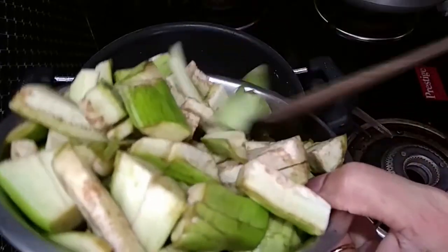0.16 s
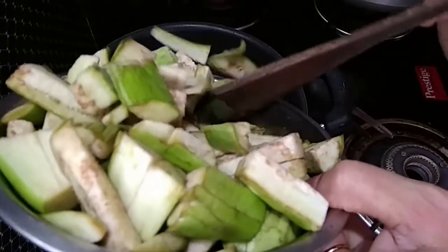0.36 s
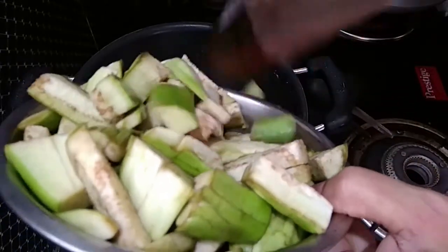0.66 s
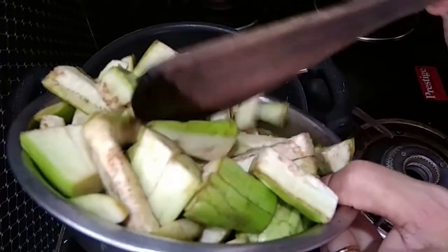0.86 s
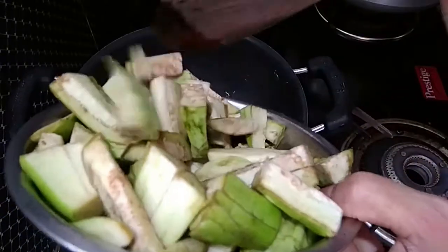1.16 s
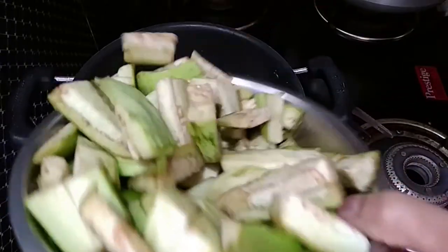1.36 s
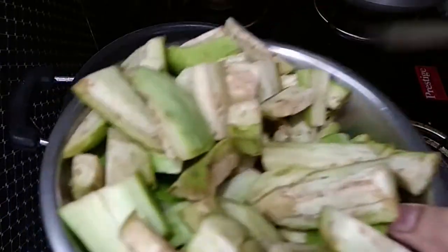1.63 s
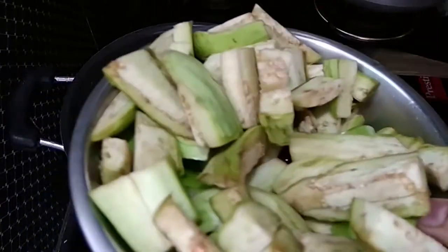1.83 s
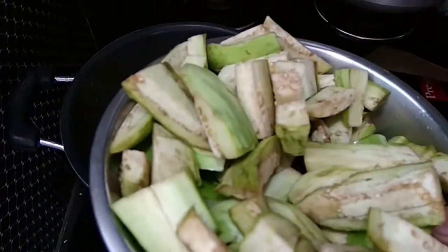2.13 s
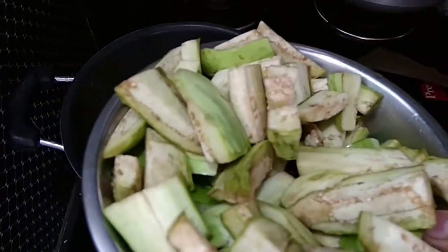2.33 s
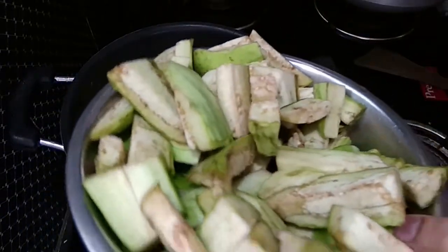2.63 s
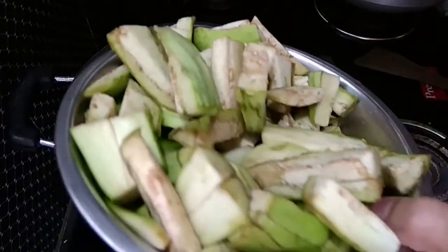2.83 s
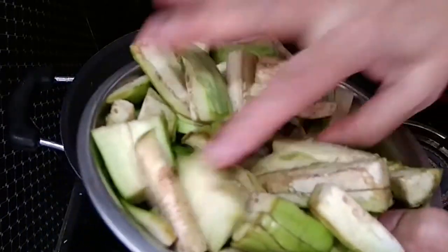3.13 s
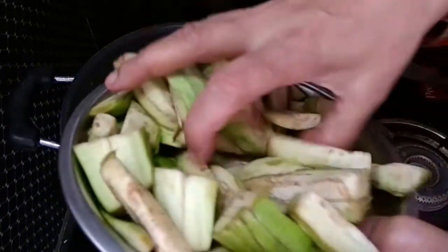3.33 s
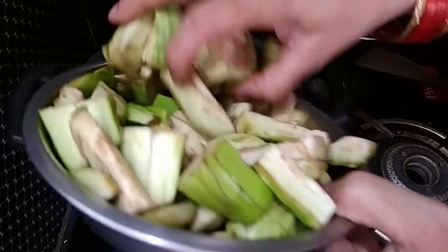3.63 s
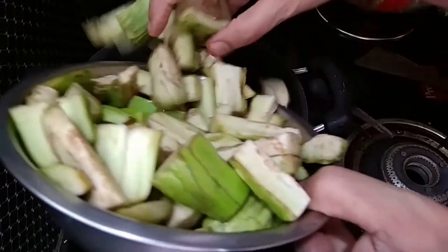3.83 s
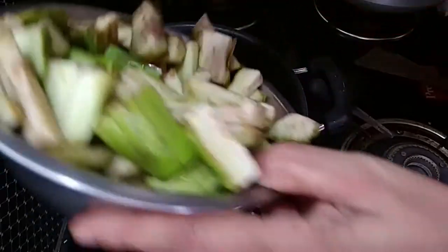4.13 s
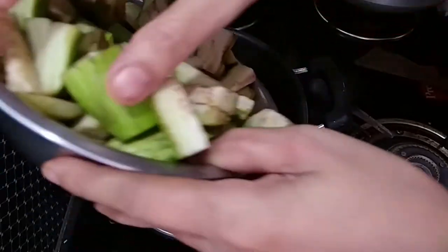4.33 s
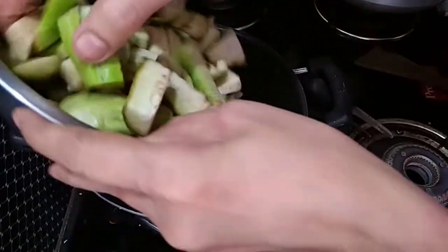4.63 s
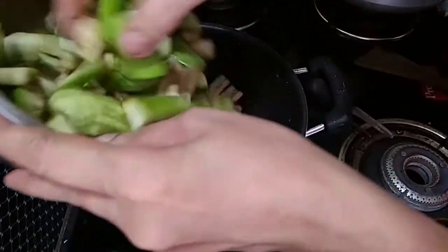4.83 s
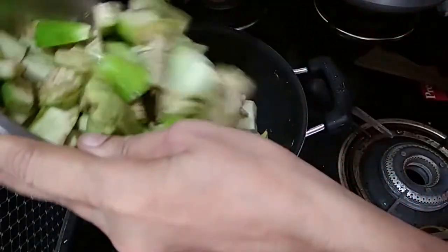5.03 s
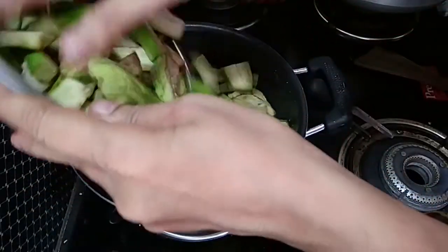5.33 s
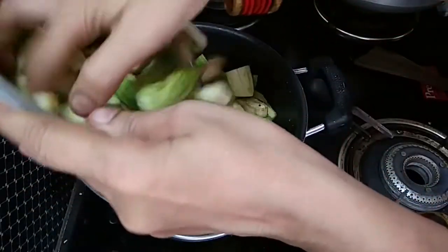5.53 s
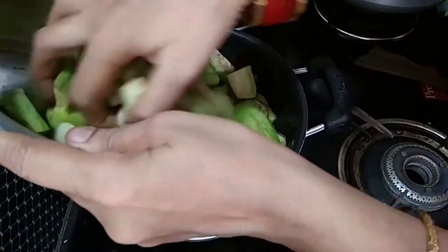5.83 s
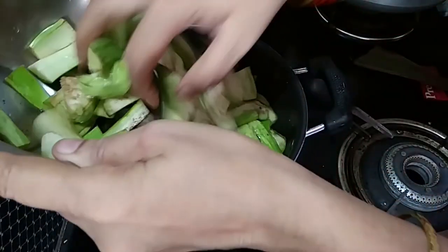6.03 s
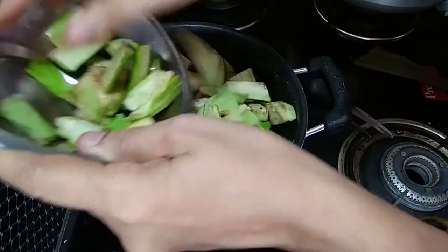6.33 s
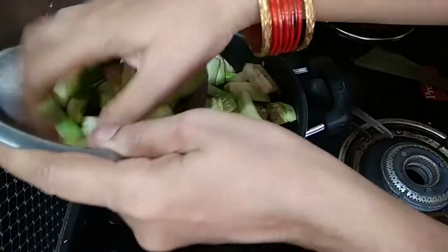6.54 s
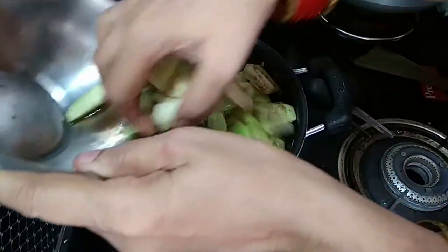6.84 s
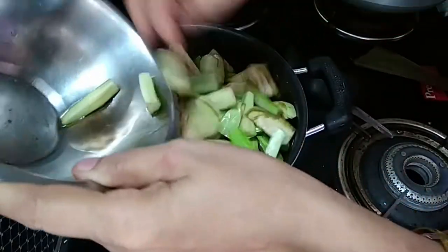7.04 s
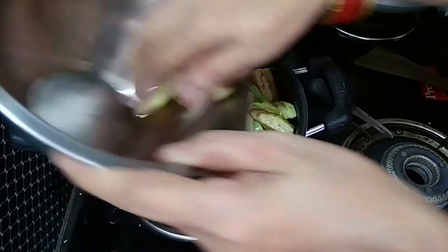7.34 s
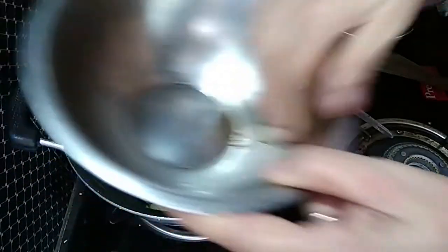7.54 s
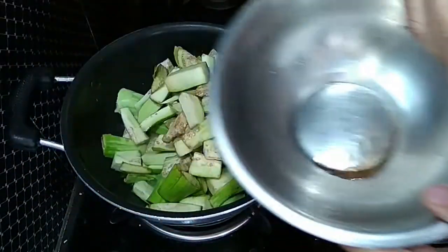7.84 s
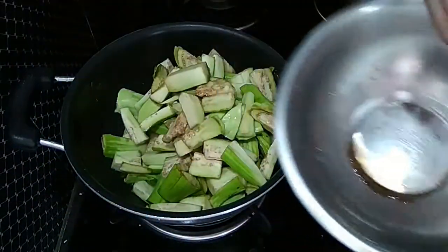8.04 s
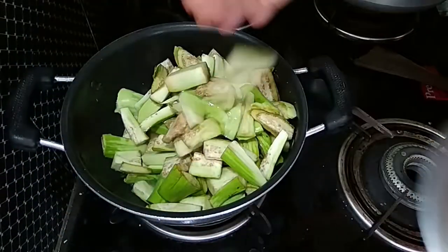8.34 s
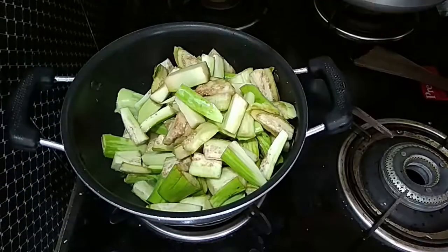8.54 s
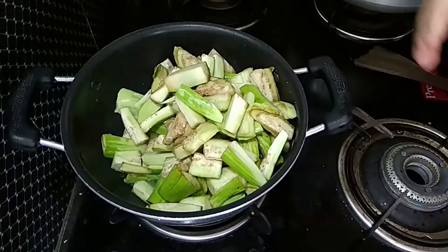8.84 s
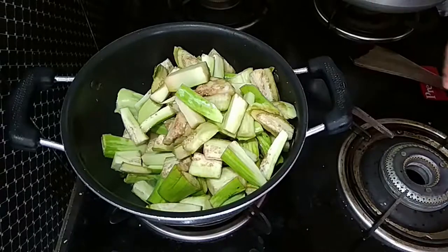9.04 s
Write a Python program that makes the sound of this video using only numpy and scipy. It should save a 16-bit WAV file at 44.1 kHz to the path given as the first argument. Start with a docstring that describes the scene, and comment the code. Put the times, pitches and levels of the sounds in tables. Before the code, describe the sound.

Hot oil fizzes and crackles close up as wet vegetable chunks tumble into a deep pan, with wooden knocks, soft thuds and sharp spits.

```python
"""A kitchen, just above a deep pan: oil sizzles as wet vegetable pieces are pushed in from a steel bowl,
first with a wooden spatula, then by hand. Random steam-burst impulses make the fizz and coarse frying;
their levels follow a drawn curve, with added flare-ups. Filtered impulses make the heap patter and tumble.
Damped resonances make thuds, clonks and knocks; short noises make slides, pops and spitting drops.
Early on, dull pressure pulses bump close to the right microphone. Reverberation and a low floor surround the pan."""
import sys
import numpy as np
from scipy import signal
from scipy.fft import rfft, irfft, next_fast_len
from scipy.io import wavfile

SR = 44100
rng = np.random.default_rng(int(sys.argv[2]) if len(sys.argv) > 2 else 0)


def bounce(signal):
    """Save signal as a 16-bit WAV file at the path given by the first command-line argument."""
    frames = np.transpose(np.atleast_2d(signal))
    limited = np.clip(frames, -1, 1)
    pcm = np.round(limited * 32767).astype(np.int16)
    wavfile.write(sys.argv[1], SR, pcm)


N = 404838  # length in samples

# how hard the oil boils; a load of cold pieces damps it for a while.
# Levels before the lift below: time_s, fizz_db, coarse_db
FRYING_CURVE = [(0, -29, -42), (.85, -27.5, -38), (1.6, -28.5, -41), (2.5, -29.5, -40), (3.0, -29.5, -45.5),
                (3.27, -32, -46), (3.42, -33, -48), (3.92, -32, -47.5), (4.05, -29.5, -41),
                (4.46, -27.5, -36.5), (4.75, -28.5, -39), (5.5, -28.5, -38), (6.3, -31, -41.5),
                (6.6, -31, -39.5), (6.95, -32.5, -43.5), (7.4, -34, -43.5), (8.15, -30.5, -41),
                (8.3, -30, -38.5), (8.8, -28, -34.5), (9.18, -28.5, -37)]
FIZZ_LIFT_DB, COARSE_LIFT_DB = 3, 3.5
# spectrum of a water drop bursting in oil: frequency_hz, level_db
SPIT_SPECTRUM = [(300, -22), (1500, -12), (5000, -9), (8000, -1), (10500, 0), (13000, -3.5), (16000, -6)]


def sizzle():
    """Superposed steam bursts: a bright fizz of tiny bubbles and a coarser frying of larger ones."""
    # spectrum of the fizz: frequency_hz, level_db
    fizz_spectrum = [(2500, -36.5), (5000, -12.5), (6800, -7.5), (8000, -2), (9200, 1), (10500, 1.5),
                     (11600, 0.3), (13000, -3.3), (14500, -3.8), (15800, -5.5)]
    # spectrum of the coarse frying: frequency_hz, level_db
    coarse_spectrum = [(150, -50), (500, -10), (1100, -8.5), (1400, -4.5), (2100, -3), (3000, -1),
                       (4000, -4.5), (5200, -2.5), (7500, -10.5), (14000, -15.5)]
    flare_coarse_db = -15  # a flare-up's coarse frying relative to its fizz
    fizz_db, coarse_db = curves(FRYING_CURVE)

    crackling = flurries(rate=90, t60=.06, depth=2.6)
    froth = unit(bursts(rate=12000, spread_db=-2.5, pan_db=-6.0))
    tiny = pitched(rate=1200, spread_db=3.2, low_hz=7400, high_hz=14200, width_hz=2000, count=6)
    ticks = unit(scattered(tiny, t60=.011, wet_db=1))
    fizz = unit(coloured(crackling * (froth + amp(-5) * ticks), fizz_spectrum))

    large = pitched(rate=1700, spread_db=4.5, low_hz=1250, high_hz=6500, width_hz=1100, count=8)
    bubbles = unit(scattered(large, t60=.014, wet_db=1))
    frying = bubbles * flurries(rate=170, t60=0.36, depth=0.16)
    coarse = unit(coloured(frying + amp(-6.5) * crackling * froth, coarse_spectrum))

    surges = flurries(rate=20, t60=.18, depth=.3)
    flare = flares()
    # steady boiling and flare-ups add as powers
    fizz_gain = np.hypot(amp(fizz_db + FIZZ_LIFT_DB), flare)
    coarse_gain = np.hypot(amp(coarse_db + COARSE_LIFT_DB), amp(flare_coarse_db) * flare)
    return surges * (fizz_gain * fizz + coarse_gain * coarse)


def bursts(rate, spread_db, pan_db):
    """Random impulse train: each burst has its own level, polarity, side and arrival lag."""
    # the bowl shades the pan until it is lifted away: time_s, left_lag_samples, lag_scatter_samples
    shading = [(0, 3, 9), (5, 4, 7), (7.3, 6, 5), (8, 9, 1.5)]
    count = int(rate * N / SR)
    size, side, path = rng.standard_normal((count, 3)).T
    at = rng.integers(N, size=count)
    size = amp(spread_db * np.minimum(size, 2.5)) * rng.choice([-1, 1], count)
    s, lag, scatter = np.transpose(shading)
    delay = np.interp(at / SR, s, lag) + np.interp(at / SR, s, scatter) * path
    late = np.round(at + delay).astype(int) % N
    left = np.bincount(late, size * amp(pan_db * side / 2), N)
    right = np.bincount(at, size * amp(-pan_db * side / 2), N)
    return np.array([left, right])


def pitched(rate, spread_db, low_hz, high_hz, width_hz, count):
    """Bubble resonance: bursts of several sizes, each size ringing briefly at its own pitch."""
    total = np.zeros((2, N))
    for hz in np.linspace(low_hz, high_hz, count):
        b, a = signal.iirpeak(hz, hz / width_hz, SR)
        total += signal.lfilter(b, a, bursts(rate / count, spread_db, pan_db=0.0))
    return unit(total)


def flurries(rate, t60, depth):
    """Relaxation: water touches the oil, the boiling power jumps at once and decays exponentially."""
    count = int(rate * N / SR)
    when, size = rng.random((count, 2)).T
    starts = np.bincount((when * N).astype(int), size ** 3, N)
    decay = amp(-120 / (t60 * SR))  # decay of power per sample
    power = 1 + depth * signal.lfilter([1], [1, -decay], starts)
    return unit(np.sqrt(power))


def flares():
    """Exponential decay: a wet face touches the oil, the frying flares up at once and boils away."""
    # flare-ups of the frying: start_s, fizz_level_db
    flare_ups = [(1.127, -23.5), (1.66, -24.5), (2.794, -26), (2.866, -36), (3.2, -26), (3.34, -22.5),
                 (3.835, -36), (3.995, -28), (4.428, -24), (5.356, -32), (5.714, -25), (5.94, -41),
                 (6.165, -26), (6.616, -20.5), (6.826, -22.5), (7.004, -23.5), (7.409, -25), (7.536, -23),
                 (7.82, -25.5)]
    flare_t60_s = 0.22
    track, t = np.zeros((1, N)), np.arange(SR // 2) / SR
    for s, db in flare_ups:
        add(track, s, amp(db - 60 * t / flare_t60_s)[None])
    return track[0]


def scattered(x, t60, wet_db, size=1024):
    """Multiple scattering: the pan wall returns each click as a dense tail, drawn anew for each block."""
    t, hop = np.arange(size) / SR, 2 * size
    blocks = np.pad(x, ((0, 0), (0, -N % hop))).reshape(2, -1, hop)
    tails = rng.standard_normal((2, blocks.shape[1], size)) * amp(-60 * t / t60)
    tails /= np.linalg.norm(tails, axis=2, keepdims=True)
    echoes = signal.fftconvolve(blocks, tails, axes=2)
    echoes[:, 1:, :size - 1] += echoes[:, :-1, hop:]  # each tail runs on into the next block
    return x + amp(wet_db) * echoes[:, :, :hop].reshape(2, -1)[:, :N]


def heap():
    """Filtered impulses: bubbles under the heap ring the hollow, light pieces patter, heavy ones tumble."""
    # spectrum of light pieces pattering: frequency_hz, level_db
    patter_spectrum = [(25, -19), (110, -26.5), (170, -6), (250, 0), (390, 0), (480, -10.5), (700, -9.5),
                       (2000, -43)]
    # spectrum of heavy pieces tumbling: frequency_hz, level_db
    tumble_spectrum = [(25, -18), (60, -9), (100, 1), (150, -1.5), (280, -7), (420, -15), (700, -32),
                       (2000, -53)]
    # level at the usual boil, and dB gained per dB of coarse frying above it
    usual_boil_db = -37.5
    bubbling_db, bubbling_growth = -41.3, 0.7
    settling_db, settling_growth = -56.5, 2.1
    stirring_db = 3.5  # bubbling stirred up by wet pieces, relative to their patter

    boil_db = curves(FRYING_CURVE)[1] - usual_boil_db
    sliding, tumbling = shoves()
    bubbling = np.hypot(amp(bubbling_db + bubbling_growth * boil_db), amp(stirring_db) * sliding)
    pattering = np.hypot(amp(settling_db + settling_growth * boil_db), sliding)

    bubbles = scattered(bursts(rate=900, spread_db=4.5, pan_db=3.0), t60=0.0048, wet_db=-5.0)
    light = scattered(bursts(rate=350, spread_db=4.5, pan_db=3.5), t60=.03, wet_db=-3.5)
    heavy = scattered(bursts(rate=500, spread_db=3.5, pan_db=3), t60=.035, wet_db=-2.5)
    return (bubbling * unit(filtered(bubbles, hollow))
            + pattering * unit(coloured(light, patter_spectrum))
            + tumbling * unit(coloured(heavy, tumble_spectrum)))


def shoves():
    """Attack, hold and exponential decay: each load starts to slide, keeps falling and comes to rest."""
    # loads of pieces pushed over the rim: start_s, length_s, patter_db, tumbling_db
    loads = [(0.0, 0.2, -53, -48.5), (0.338, 0.24, -47.5, -54), (0.609, 0.24, -43, -47),
             (0.972, 0.38, -48.5, -47.5), (1.473, 0.35, -54, -56), (2.085, 0.67, -55.5, -64),
             (2.952, 0.024, -52, -58), (3.916, 0.27, -52.5, -58), (4.0, 0.092, -73, -51.5),
             (4.345, 0.6, -53.5, -63.5), (4.91, 0.42, -53, -50), (5.422, .16, -64, -62),
             (5.697, 0.17, -56, -75), (6.016, 0.47, -52, -60.5), (6.837, 0.11, -61, -58),
             (7.11, 0.12, -61, -81), (8.378, 0.78, -69, -70)]
    attack_s, settle_t60_s = 0.0048, 0.43
    t, strength = np.arange(N) / SR, np.zeros((2, N))
    for s, length, patter_db, deep_db in loads:
        age = t[:int((length + settle_t60_s) * SR)]
        attack = np.minimum(age / attack_s, 1)
        settling = amp(-60 * np.maximum(age - length, 0) / settle_t60_s)
        add(strength, s, amp([[patter_db], [deep_db]]) * attack * settling)
    return strength


def hollow(hz):
    """Cavity resonance: a sum of air modes in the pan, weakened at low frequencies."""
    # air modes in the hollow of the pan: centre_hz, width_hz, level_db
    air_modes = [(517, 23, 2), (622, 23.5, 7.5), (753, 45, 3), (853, 59, 2), (973, 18, -1),
                 (1136, 31, -13.5), (1255, 48, -4), (1379, 78, 0), (1503, 43, -4), (1620, 21, -8),
                 (1880, 29, -14), (2177, 200, -4)]
    total = 0
    for centre, width, db in air_modes:
        damping = 1j * hz * width
        total = total + amp(db) * damping / (centre ** 2 - hz ** 2 + damping)
    return total * (hz / np.hypot(hz, 380)) ** 3


def blows():
    """Impact excitation: soft pieces thud; wood and firm pieces clonk, knock and ring the pan's hollow."""
    # pieces landing on the heap: start_s, level_db, pitch_hz
    landings = [(0.227, -29, 860), (0.471, -25, 780), (.832, -33, 594), (.869, -29, 690),
                (0.989, -30.5, 492), (1.083, -31.5, 405), (1.09, -38, 333), (1.185, -31, 396),
                (2.107, -30, 480), (2.293, -33, 470), (2.518, -27, 512), (2.521, -28, 280),
                (2.533, -36, 330), (2.55, -34, 470), (2.564, -32, 265), (2.694, -35.5, 463),
                (4.036, -37.5, 322), (4.415, -37, 217), (4.484, -39.5, 340), (4.834, -39, 290),
                (5.194, -38, 148), (5.44, -47, 395), (6.834, -32.5, 347), (6.858, -38, 305),
                (6.88, -43, 205), (6.93, -45, 214)]
    # blunt, woody blows on the loaded bowl, before the low-pass: start_s, level_db, pitch_hz
    blunt_blows = [(.144, -27, 590), (.219, -22, 800), (.228, -24.5, 900), (1.129, -23, 1260),
                   (2.531, -28, 1050), (2.553, -25.5, 1240), (3.191, -20.5, 765), (3.199, -16.5, 1040),
                   (3.206, -21, 990), (4.412, -25.5, 805), (6.751, -32, 980), (7.218, -31.5, 800)]
    # spatula and pieces knocking on bowl and pan: start_s, level_db, pitch_hz, crack_db (relative to level_db)
    hard_blows = [(.154, -25.5, 1510, -6), (.473, -22.5, 1600, -2), (.64, -23.5, 1890, -3),
                  (0.697, -20, 1630, -7), (0.839, -18, 2280, -8), (0.857, -23, 2120, -5),
                  (.877, -23.5, 2450, 0), (.893, -29, 2300, -4), (0.996, -17.5, 2100, -1),
                  (1.013, -23, 2400, -6), (1.128, -22, 1490, -4), (1.309, -25, 1370, -3),
                  (1.323, -26.5, 1590, -8), (1.663, -26.5, 2400, -8), (2.247, -22, 2920, -1),
                  (2.407, -26, 3000, -9), (2.703, -26, 1500, -14), (3.238, -28, 2200, -6),
                  (3.266, -39, 3200, 2), (3.278, -41, 3400, 2), (3.325, -27, 2300, -4),
                  (4.43, -25, 2800, 1), (4.454, -23, 1470, -6), (4.489, -26, 1350, -8),
                  (4.828, -26.5, 1320, -11), (5.357, -21, 2180, -12), (5.445, -28, 1400, -8),
                  (5.555, -23, 2820, 4), (5.57, -25, 2520, -5), (5.589, -23, 2200, -7),
                  (5.676, -23, 1550, -9), (5.696, -36, 1500, -12), (5.918, -21, 4270, -9),
                  (5.941, -19, 2560, -6), (6.093, -20.5, 2400, -8), (6.123, -23, 1930, -2),
                  (6.424, -25.5, 2000, -11), (6.451, -22, 1960, 1.5), (6.541, -23, 1910, -15),
                  (6.574, -25, 2100, -14), (6.616, -24, 1530, -12), (6.7592, -17.5, 2090, -10),
                  (6.963, -33, 2000, -11), (7.526, -32, 3180, -2), (7.668, -28.5, 1620, -12),
                  (8.218, -23, 4350, -5), (8.223, -22, 4000, -7), (8.408, -24.5, 2800, 2)]
    clonk_t60_s, clonk_top_hz = .14, 1700  # the load damps the bowl and swallows its treble
    rattle_t60_s = 0.22
    soft, blunt, hard = np.zeros((3, 2, N))
    for s, db, hz in landings:
        t60 = 0.092 * (300 / hz) ** 0.7  # higher thuds die sooner
        add(soft, s, amp(db) * thud(hz, t60))
    for s, db, hz in blunt_blows:
        add(blunt, s, amp(db) * contact(hz, clonk_t60_s, sharpness=1.8))
    for s, db, hz, crack_db in hard_blows:
        add(hard, s, amp(db) * contact(hz, rattle_t60_s, sharpness=1.75))
        add(hard, s, amp(db + crack_db) * crack(hz))
    lowpass = signal.butter(6, clonk_top_hz, fs=SR, output="sos")
    struck = hard + signal.sosfilt(lowpass, blunt)
    return soft + struck + amp(-6.5) * filtered(struck, hollow)


def thud(hz, t60, size=9000):
    """Damped oscillation: a note that sags as a soft piece settles, with equally decaying rustle."""
    t = np.arange(size) / SR
    note = np.sin(2 * np.pi * hz * t * (1 - 1.4 * t)) * (1 - np.exp(-t / 0.00092))

    def rustle_response(f):
        resonance = 1 / (1 + 1.5j * (f / hz - hz / (f + 1)))
        return resonance / (1 + (f / (1.6 * hz)) ** 4)

    rustle = unit(filtered(rng.standard_normal((2, size)), rustle_response))
    return (note + rustle) * amp(-60 * t / t60)


def contact(hz, t60, sharpness, size=7000):
    """Forced resonance: an impulse, milliseconds of chatter and a rattle drive a damped mode to about peak 1."""
    t = np.arange(size) / SR
    chatter = amp(-17 - 60 * t / .012) + amp(-27.5 - 60 * t / t60)
    force = chatter * rng.choice([-1, 1], (2, size))
    force[:, 0] += 1

    def response(f):
        resonance = 1j * f * hz / (sharpness * (hz * hz - f * f) + 1j * f * hz)
        return resonance / (1 + .22j * f / hz) ** 3

    ring = filtered(force, response)
    return ring / (2 * ring[:, :SR // 250].std())


def crack(hz, size=600):
    """Band-limited noise burst: a few milliseconds of broad noise around the given pitch."""
    crack_t60_s = .012
    noise = rng.standard_normal((2, size))
    band = unit(filtered(noise, lambda f: f * hz / (hz * hz - f * f + 1.3j * f * hz)))
    return band * amp(-60 * np.arange(size) / SR / crack_t60_s)


def scrapes():
    """Stick-slip friction: a dense run of tiny random jerks excites a resonance, then dies away."""
    # spatula and wet pieces skidding over the steel: start_s, length_s, rms_db, pitch_hz
    skids = [(0.471, .01, -37, 1400), (0.839, 0.058, -32.5, 2220), (.996, .02, -33, 2000),
             (1.124, .01, -28.5, 1400), (6.756, .012, -32.5, 1900)]
    slips_per_s, scrape_t60_s = 1400, .04
    track, t = np.zeros((2, N)), np.arange(SR // 6) / SR
    for s, length, db, hz in skids:
        slips = rng.standard_normal((2, len(t))) * (rng.random(len(t)) < slips_per_s / SR)

        def response(f):
            resonance = 1j * f * hz / (hz * hz - f * f + 1j * f * hz)
            return resonance / (1 + .3j * f / hz) ** 2

        rasp = unit(filtered(slips, response))
        add(track, s, amp(db - 60 * np.maximum(t - length, 0) / scrape_t60_s) * rasp)
    return track


def pops():
    """Transient noise: single larger steam bubbles pop out of the frying as short pitched cracks."""
    # larger steam bubbles: start_s, level_db, pitch_hz
    steam_bubbles = [(.196, -22, 2600), (.373, -21, 2300), (1.205, -19, 2400), (1.242, -21, 2600),
                     (1.471, -21, 3200), (1.682, -21, 2500), (1.707, -19, 4300), (1.727, -21, 4300),
                     (1.827, -21, 4400), (2.011, -24, 4000), (2.215, -20, 2500), (2.805, -22, 2600),
                     (3.057, -24, 3100), (3.088, -26, 3400), (3.138, -26, 3400), (3.445, -23, 5000),
                     (3.619, -27, 2700), (3.677, -24, 2800), (4.135, -22, 3200), (4.585, -19, 2600),
                     (4.759, -21, 5400), (4.882, -21, 4400), (5.123, -20, 2600), (5.252, -21, 2200),
                     (5.829, -19, 2700), (5.968, -23, 2300), (6.35, -24, 2600), (6.371, -21, 2300),
                     (6.408, -21, 2800), (6.561, -22, 2600), (6.772, -21, 2300), (6.973, -25, 3000),
                     (7.056, -23, 2800), (7.158, -23, 3200), (7.224, -25, 1700), (7.333, -23, 4700),
                     (7.35, -23, 2600), (8.092, -25, 2500), (8.488, -19, 1900), (8.708, -19, 2800),
                     (8.717, -20, 2100), (8.867, -19, 3400), (8.982, -19, 2100), (8.996, -19, 4000)]
    track = np.zeros((2, N))
    for s, db, hz in steam_bubbles:
        add(track, s, amp(db) * crack(hz))
    return track


def spits(size=2500):
    """Explosive boiling: a drop bursts with a snap, a few milliseconds of spitting and a short spray."""
    # water drops bursting in the oil: start_s, level_db (mean of left and right)
    drops = [(.157, -13), (.1925, -13), (.4474, -7.5), (.583, -13), (1.4701, -13), (1.61, -12),
             (1.826, -13), (1.9694, -8), (2.5057, -11), (2.8664, -8), (3.005, -14), (3.0095, -13),
             (3.126, -16), (3.1374, -15), (3.2789, -8), (3.298, -15), (3.3233, -10), (3.626, -15),
             (3.8347, -14), (3.869, -15), (3.9994, -13), (4.1355, -12), (4.812, -13), (5.012, -13),
             (5.3562, -7.5), (5.7139, -7), (5.9409, -8.5), (6.2482, -8.5), (6.759, -12), (7.003, -10),
             (7.157, -14), (7.2295, -8), (7.5263, -9), (8.2177, -12), (8.223, -10), (8.4073, -9.5),
             (8.5395, -11.5)]
    left_right_db = 1.2
    track, t = np.zeros((2, N)), np.arange(size) / SR
    for s, db in drops:
        spitting = np.exp(-(t / .0036) ** 2)
        spray = amp(-21 - 60 * t / .1)
        burst = (spitting + spray) * rng.choice([-1, 1], (2, size))
        burst[:, 0] = amp(12)
        snap = coloured(burst, SPIT_SPECTRUM)
        add(track, s, amp(db) * snap / np.abs(snap).max(axis=1, keepdims=True))
    return track * amp([[left_right_db / 2], [-left_right_db / 2]])


def spatter():
    """Random impulses: small drops pop with a brief spray; the tiniest give one needle-sharp tick."""
    # spectrum of the tiniest droplets' dry ticks: frequency_hz, level_db
    needle_spectrum = [(400, -20), (1500, -7), (5000, -5), (9000, 0), (12000, -1), (16000, -4)]
    drops = scattered(bursts(rate=40, spread_db=1.5, pan_db=2), t60=.026, wet_db=10)
    small_pops = unit(coloured(drops, SPIT_SPECTRUM))
    needles = unit(coloured(bursts(rate=55, spread_db=2.2, pan_db=2), needle_spectrum))
    fizz_gain = amp(curves(FRYING_CURVE)[0] + FIZZ_LIFT_DB)
    return fizz_gain * (amp(-12.5) * small_pops + amp(-17) * needles)


def bumps(size=22000):
    """Pressure pulse: air is pushed and pulled at the right port, rebounds and leaves a faint low rumble."""
    # soft bumps beside the microphone: start_s, level_db
    soft_bumps = [(0.147, -18), (0.2072, -14.5), (0.467, -22), (0.634, -17), (.692, -21), (0.7522, -10.5),
                  (0.8145, -18.5), (.85, -22), (0.9993, -20), (1.122, -12.5), (1.302, -17.5), (1.464, -9),
                  (1.656, -20.5)]
    track, lead = np.zeros((2, N)), .02  # the push begins before the listed time
    t = np.arange(size) / SR - lead
    after = np.maximum(t, 0)
    rebound = -np.sin(2 * np.pi * 102 * after) * amp(-7 - 60 * after / .085)
    for s, db in soft_bumps:
        length = 0.0038 * amp(db) ** .5  # seconds; stronger bumps have a longer push
        push = -np.tanh(t / 0.00035) * np.exp(-np.abs(t / length) ** 1.4)
        noise = rng.standard_normal((2, size))
        rumble = unit(filtered(noise, lambda hz: np.exp(-((hz - 94) / 36) ** 2)))
        rumble = rumble * (1 - np.exp(-after / .008)) * amp(-27 - 60 * after / .75)
        add(track, s - lead, amp(db) * amp([[-16], [0]]) * (push + rebound + rumble))
    return track


def room(x, size=10240):
    """Reverberation: noise tails decay at a rate set by frequency, and are drawn anew for each block."""
    # the kitchen's decay times: frequency_hz, t60_s
    decay_times = [(150, 0.052), (1500, 0.24), (12000, 0.04)]
    blocks = np.pad(x, ((0, 0), (0, -N % size))).reshape(2, -1, size)
    hz, t, z = signal.stft(rng.standard_normal(blocks.shape), SR, nperseg=256)
    decay = amp(-60 * t / along(decay_times, hz)[:, None])
    tails = signal.istft(z * decay, SR, nperseg=256)[1][..., :size]
    tails /= np.linalg.norm(tails, axis=2, keepdims=True)
    echoes = signal.fftconvolve(blocks, tails, axes=2)
    echoes[:, 1:, :size - 1] += echoes[:, :-1, size:]
    return echoes[:, :, :size].reshape(2, -1)[:, :N]


def kitchen_floor():
    """Stationary noise: a faint, mostly low background shaped from white noise."""
    # spectrum of the kitchen background: frequency_hz, level_db
    floor_spectrum = [(20, 4.5), (60, -4), (130, -0.5), (260, -12), (500, -28), (3000, -23)]
    return amp(-64.5) * unit(coloured(rng.standard_normal((2, N)), floor_spectrum))


def amp(db):
    """Logarithmic level: decibels to gain."""
    return 10 ** (np.asarray(db) / 20)


def unit(x):
    """Root mean square: scale to rms 1."""
    return x / np.sqrt(np.mean(x ** 2) + 1e-20)


def along(points, hz):
    """Logarithmic frequency: interpolate (frequency_hz, value) points on a log axis."""
    f, v = np.transpose(points)
    return np.interp(np.log(hz + 1), np.log(f + 1), v)


def curves(rows):
    """Linear interpolation: one value per sample for each column after the time."""
    s, *cols = np.transpose(rows)
    return [np.interp(np.arange(N) / SR, s, c) for c in cols]


def filtered(x, response):
    """Linear filtering: the spectrum times a complex response of frequency."""
    size = x.shape[-1]
    m = next_fast_len(size + 8192, real=True)
    return irfft(rfft(x, m) * response(np.fft.rfftfreq(m, 1 / SR)), m)[..., :size]


def coloured(x, spectrum, size=2048):
    """Minimum phase: causal colouring, so that clicks keep their sharp front."""
    gain = amp(along(spectrum, np.fft.rfftfreq(size, 1 / SR)))
    cepstrum = irfft(np.log(gain))
    fold = np.r_[1, np.full(size // 2 - 1, 2), 1, np.zeros(size // 2 - 1)]
    impulse = irfft(np.exp(rfft(cepstrum * fold)))
    return signal.oaconvolve(x, impulse[None], axes=1)[:, :x.shape[1]]


def add(track, s, sound):
    """Superposition: mix a sound into the track at time s."""
    start = int(np.clip(round(s * SR), 0, N - 1))
    track[:, start:start + sound.shape[1]] += sound[:, :N - start]


def scene():
    """Superposition: the pan and its reverberation, the close bumps and the kitchen floor."""
    # the left microphone hears the middle range better: frequency_hz, left_right_db
    left_lean = [(100, 1.5), (330, 6), (500, 2), (780, 2.5), (1000, 3), (1500, 6), (2200, 3.5), (3200, 2),
                 (7000, 1.1), (9000, 3), (11500, -1), (15000, -1)]
    pan = sizzle() + heap() + blows() + scrapes() + pops() + spits() + spatter()
    pan = pan + amp(-6.5) * room(pan)
    heard = filtered(pan, lambda hz: amp(np.outer([.5, -.5], along(left_lean, hz))))
    floor = kitchen_floor()
    return heard + bumps() + floor


def record(dry):
    """Band limiting: nothing is kept above the top frequency."""
    top_hz = 15800
    return filtered(dry, lambda hz: hz < top_hz)


dry = scene()
out = record(dry)
bounce(out)
```